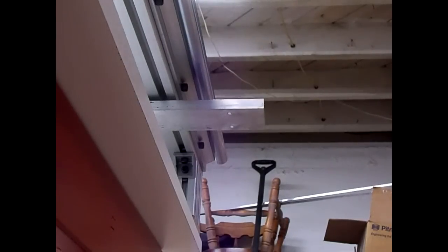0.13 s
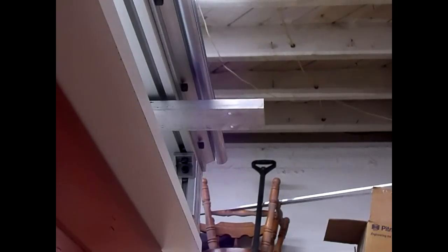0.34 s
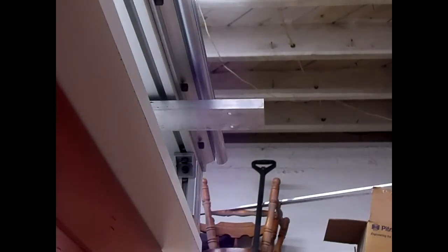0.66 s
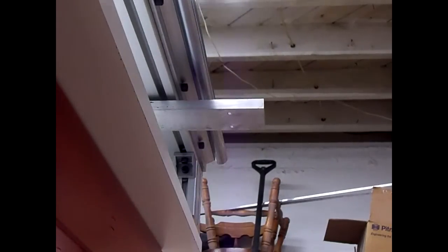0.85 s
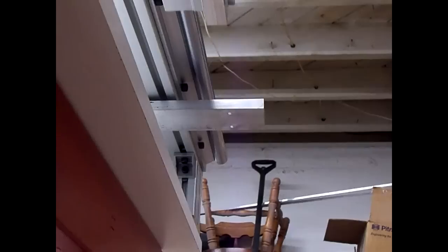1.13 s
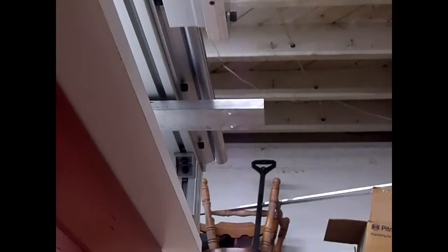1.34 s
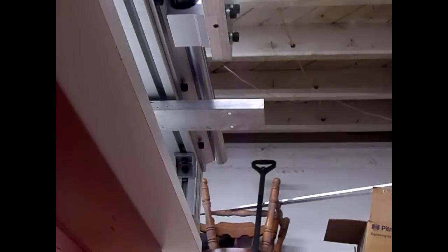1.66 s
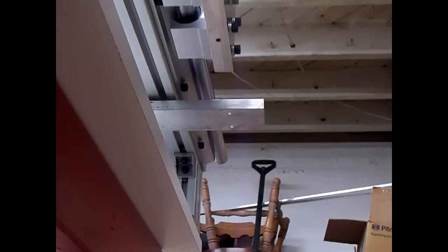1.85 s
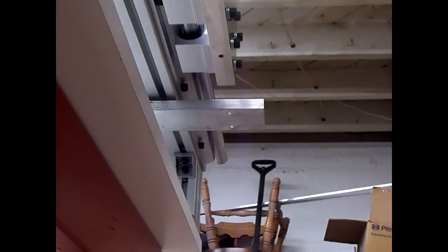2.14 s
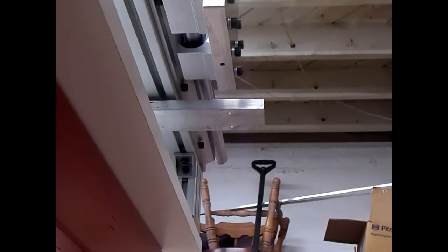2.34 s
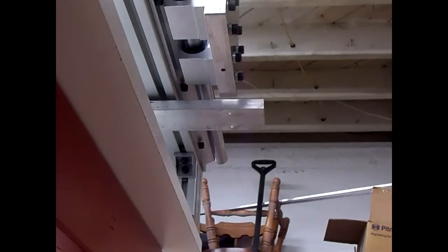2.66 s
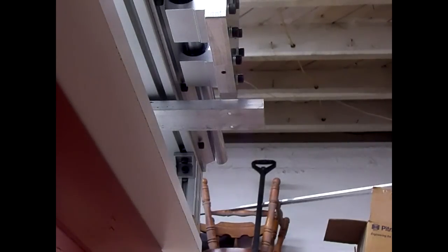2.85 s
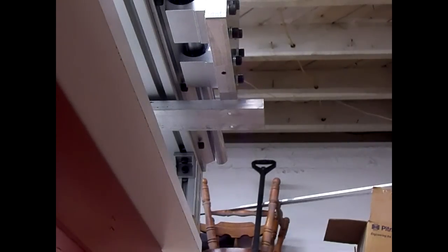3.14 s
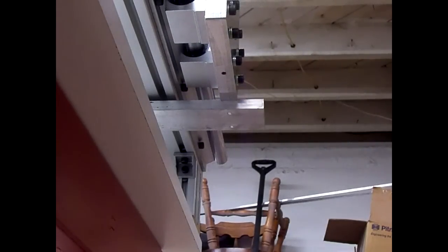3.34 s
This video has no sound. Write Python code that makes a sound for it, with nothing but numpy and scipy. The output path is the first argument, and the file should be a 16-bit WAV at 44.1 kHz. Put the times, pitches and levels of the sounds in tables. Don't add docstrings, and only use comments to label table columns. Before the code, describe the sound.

Hissing, ticking roll of a bearing carriage on a rail fades to a bump before a metallic crash.

```python
import sys
import numpy as np
from scipy import signal
from scipy.io import wavfile
from scipy.ndimage import uniform_filter1d

SR = 44100
rng = np.random.default_rng(int(sys.argv[2]) if len(sys.argv) > 2 else 0)


def transcribe(u):
    v = np.clip(np.atleast_2d(u).T, -1, 1)
    q = np.round(v * 32767).astype(np.int16)
    wavfile.write(sys.argv[1], SR, q)


def invert_db(x):
    u = np.asarray(x, float) / 20
    return 10 ** u


N = 154350

# (time [s], level [dB]); the last row is the stop
ROLLING_FORCE = [(0, -26), (.1, -26), (.28, -25.5), (.38, -23), (.5, -23), (.7, -24), (.8, -28.5),
                 (.93, -32), (1.12, -35.5), (1.25, -36.5), (1.54, -40), (1.76, -43), (1.95, -38.5),
                 (2.3, -43), (2.501, -48)]
ROLL_END_S = ROLLING_FORCE[-1][0]


def evened(x):
    return x / np.sqrt(np.mean(x ** 2) + 1e-20)


def add(mix, s, sound):
    part = mix[round(s * SR):][:len(sound)]
    part += sound[:len(part)]


def colour(x, points):
    hz, db = np.transpose(points)
    bin_hz = np.abs(np.fft.fftfreq(4096, 1 / SR))
    log_gain = np.log(invert_db(np.interp(np.log(bin_hz + 1), np.log(hz + 1), db)))
    taps = np.fft.ifft(np.exp(np.conj(signal.hilbert(log_gain)))).real
    return signal.oaconvolve(x, taps / np.linalg.norm(taps))[:len(x)]


def resonate(x, hz, width_hz):
    radius = np.exp(-np.pi * width_hz / SR)
    pole = radius * np.exp(2j * np.pi * hz / SR)
    return np.sqrt(2 * (1 - radius ** 2)) * signal.lfilter([1], [1, -pole], x).imag


def ring(x, modes):
    return sum(invert_db(db) * resonate(x, hz, 2.2 / t60) for hz, db, t60 in modes)


def dull(x, edge_hz):
    leak_db = -21.5
    low = signal.sosfilt(signal.butter(5, edge_hz, fs=SR, output="sos"), x)
    return low + invert_db(leak_db) * x


def clicks(count, per_s, spread_db):
    chance, side, size = rng.random((3, count))
    size_db = spread_db * np.minimum(-np.log(size + 1e-9), 4)
    return evened((chance < per_s / SR) * np.sign(side - .5) * invert_db(size_db))


def slow(rate_hz):
    hz = np.geomspace(rate_hz / 10, rate_hz, 24)[:, None]
    at = np.arange(0, N + 32, 32)
    waves = np.sin(2 * np.pi * (hz * at / SR + rng.random(hz.shape)))
    return evened(np.interp(np.arange(N), at, np.sum(waves, 0)))


def patchy(x, depth_db):
    z = signal.stft(x, nperseg=512, noverlap=384)[2]
    field = rng.standard_normal(z.shape[::-1])
    field = uniform_filter1d(field, size=12, axis=0)
    field = uniform_filter1d(field, size=6, axis=1)
    return signal.istft(z * invert_db(depth_db * evened(field).T), nperseg=512, noverlap=384)[1][:N]


def swells(rows, hz, wander):
    t = np.arange(N) / SR
    power = sum(invert_db(2 * db) * np.exp(-(3.63 * (t - s) / length) ** 2) for s, db, length in rows)
    level = np.sqrt(2 * power) * invert_db(0.71 * slow(25.9))
    cycles = np.cumsum(hz * (1 + wander * slow(19))) / SR
    return level * np.sin(2 * np.pi * cycles)


def bumps(rows, spectrum, modes):
    modes_db = -6
    snap = 3
    out, t = np.zeros(N), np.arange(SR // 4) / SR
    for s, db, rise, t60, edge_hz in rows:
        grit = .5 * clicks(len(t), 4000, 2.5) + rng.standard_normal(len(t))
        grit[round(rise * SR)] = snap
        push = grit * np.minimum(t / rise, 1) ** 2 * invert_db(db - 60 * np.maximum(t - rise, 0) / t60)
        add(out, s, dull(colour(push, spectrum) + invert_db(modes_db) * ring(push, modes), edge_hz))
    return out


def force_db():
    stop_t60_s = 0.13
    t = np.arange(N) / SR
    s, db = np.transpose(ROLLING_FORCE)
    return np.interp(t, s, db) - 60 * np.maximum(t - ROLL_END_S, 0) / stop_t60_s


def rolling():
    # (frequency [Hz], density [dB per Hz])
    fast_hiss = [(18, -60), (30, -54), (54, -49), (80, -20), (114, -14), (281, -9.5), (336, 3), (800, -5.5),
                 (1610, -9), (14000, -26.5)]
    # (frequency [Hz], density [dB per Hz])
    slow_hiss = [(18, -18), (30, -37), (120, -0.5), (260, -12), (1460, -13.5), (1700, -14.5), (2840, -23),
                 (8810, -27), (14000, -33)]
    # (frequency [Hz], width [Hz], level when fast [dB], level when slow [dB])
    rail_notes = [(352, 24, -10.5, -26), (422, 60, -12, -13.5), (567, 38, -24, -12), (662, 17, -19, -18),
                  (1111, 33, -44, -15), (1266, 26, -18.5, -17), (1705, 70, -14, -71),
                  (2200, 500, -13, -14.5), (4750, 770, -24, -18.5)]
    # (frequency [Hz], width [Hz], when fast [dB], when slow [dB])
    slow_note = (1715, 50, -36, -11)
    fast_at_db, slow_at_db = -25, -35.5
    contacts_per_s, contact_spread_db, contact_share = 4000, 2, 0.99

    db = force_db()
    fast = np.clip((db - slow_at_db) / (fast_at_db - slow_at_db), 0, 1)
    contacts = contact_share * clicks(N, contacts_per_s, contact_spread_db)
    drive = evened(contacts + rng.standard_normal(N)) * invert_db(0.19 * slow(56))
    out = np.sqrt(fast) * colour(drive, fast_hiss)
    out = out + np.sqrt(1 - fast) * invert_db(-4.5) * colour(drive[::-1], slow_hiss)
    for hz, width_hz, fast_db, slow_db in list(rail_notes) + [slow_note]:
        out = out + invert_db(slow_db + (fast_db - slow_db) * fast) * resonate(drive, hz, width_hz)
    return invert_db(db) * patchy(out, 1.1)


def bench():
    # (peak time [s], level [dB], length [s])
    hum = [(0.153, -41.5, 0.22), (.39, -32.5, 0.31), (0.556, -37, 0.15), (0.702, -30.5, 0.11),
           (.83, -35.5, 0.1), (0.973, -41, 0.28), (1.131, -32, 0.15), (1.344, -32, 0.19),
           (1.587, -46.5, 0.54), (1.84, -41, .12), (1.948, -33, 0.12), (2.045, -34.5, 0.18),
           (2.18, -39.5, 0.16), (2.314, -38, 0.25)]
    # (peak time [s], level [dB], length [s])
    shelf = [
        (.05, -42, 0.81),
        (.5, -37.5, 0.44),
        (.92, -40, 0.17),
        (1.33, -41.5, 0.43),
        (1.8, -42.5, 0.32),
        (2.3, -48, 0.25),
    ]
    # (peak time [s], level [dB], length [s])
    sway = [
        (.02, -39.5, 0.21),
        (.36, -47, 0.21),
    ]
    # (peak time [s], level [dB], length [s])
    thump = [
        (3.12, -43, 0.13),
        (3.22, -48, 0.22),
    ]
    return (swells(hum, 118, 0.018) + swells(shelf, 188.7, 0.0066)
            + swells(sway, 54.3, 0.056) + swells(thump, 100, 0.081))


def air():
    # (frequency [Hz], density [dB per Hz])
    air_spectrum = [(15, -21), (25, -7), (155, -11), (192, -13.5), (525, -19.5), (1360, -26.5),
                    (1780, -29.5), (1920, -28), (14000, -36.5)]
    return invert_db(-43.5 + 0.99 * slow(8)) * colour(rng.standard_normal(N), air_spectrum)


def block_bumps():
    # (time [s], level [dB], rise [s], t60 [s], dull edge [Hz])
    pushes = [
        (.036, -28.5, 0.022, 0.21, 15900),
        (.06, -25, 0.013, 0.14, 16000),
        (2.638, -26.5, 0.00039, 0.05, 2310),
        (2.638, -28.5, 0.00036, 0.085, 6240),
        (2.647, -34.5, 0.00057, 0.22, 14300),
        (2.845, -50, 0.008, 0.061, 2200),
    ]
    # (time [s], level [dB], rise [s], t60 [s], dull edge [Hz])
    grazes = [
        (2.501, -34, 0.021, 0.073, 15900),
        (2.506, -45, 0.0029, 0.023, 3620),
    ]
    # (frequency [Hz], density [dB per Hz])
    block_body = [(88, -45), (150, -17), (434, 5.5), (1800, -1), (3310, -4), (5740, -3.5), (14000, -9.5)]
    # (frequency [Hz], level [dB], t60 [s])
    block_modes = [(393, -7, .04), (494, -7, .05), (775, 2, .05), (1040, -10, .03), (1577, -11, .03),
                   (1943, -8, .035), (2331, -15, .03)]
    # (frequency [Hz], level [dB], t60 [s])
    graze_modes = [(450, -6, .02), (1696, -12, .02), (2929, -9, .02)]
    return bumps(pushes, block_body, block_modes) + bumps(grazes, block_body, graze_modes)


def surges():
    # (time [s], level [dB], note [Hz])
    flares = [(.065, -24, 1360), (.15, -26, 1660), (.17, -28, 665), (0.313, -27.5, 350), (.365, -47, 620),
              (0.451, -29, 432), (.465, -23, 1130), (.5, -35, 1560), (.53, -41, 400), (0.583, -22, 1220),
              (0.619, -25.5, 570), (0.709, -32, 1620), (.76, -30, 610), (.83, -29, 1590)]
    rise_s, t60_s, width_hz = 0.0073, .12, 60
    out, t = np.zeros(N), np.arange(SR // 5) / SR
    shape = np.minimum(t / rise_s, 1) * invert_db(-60 * np.maximum(t - rise_s, 0) / t60_s)
    for s, db, hz in flares:
        grit = rng.standard_normal(len(t))
        add(out, s, invert_db(db) * resonate(shape * grit, hz, width_hz))
    return out


def ticks():
    # (time [s], peak level [dB], ring [Hz], treble share [dB])
    ball_ticks = [(0.1745, -21.5, 4730, -6), (0.31, -18, 4560, -1), (0.3316, -15.5, 4330, -8),
                  (0.3605, -25, 3890, -4), (0.394, -14, 4550, -3), (0.4304, -16.5, 4440, 0),
                  (0.458, -11.5, 5040, -4), (0.4907, -12.5, 4400, -10), (0.551, -15, 4250, -14),
                  (0.6054, -22, 4380, 0), (0.6967, -18, 3850, -16), (0.7426, -32, 4450, -16),
                  (0.7941, -28, 4730, -10), (0.8145, -20.5, 5240, -8), (0.867, -27, 5120, -6),
                  (0.8807, -32, 3800, -6), (0.9284, -28.5, 5520, -6), (0.955, -35, 5310, 3),
                  (1.0147, -27, 4120, -3), (1.0914, -24, 4740, -4), (1.1094, -32, 5060, -6),
                  (1.1364, -43, 4550, 2), (1.189, -29, 4930, -6), (1.2097, -29.5, 5100, 0),
                  (1.236, -39, 6470, 11), (1.289, -37, 5220, -6), (1.311, -31, 5840, 4),
                  (1.3915, -31, 5030, -1), (1.411, -32, 4550, 3), (1.5265, -30.5, 4130, 4),
                  (1.5574, -28, 4600, 2.5), (1.6256, -31.5, 5030, 7), (1.705, -32.5, 4960, 5),
                  (1.8292, -28.5, 4990, -6), (1.955, -33, 5430, 6), (1.975, -32, 4660, 3),
                  (2.022, -36, 5720, 5), (2.1058, -31.5, 4870, 9.5), (2.2434, -33.5, 4730, 4),
                  (2.413, -34, 7950, 4)]
    small_per_s, small_db, small_ring_hz, small_treble_db = 70, -2.5, 4830, -1
    tick_db, t60_s, width_hz = -5, .014, 1700
    treble_hz, low_cut_hz = 8150, 3400

    db = force_db()
    rows = list(ball_ticks)
    for when, size, pitch in rng.random((round(small_per_s * ROLL_END_S), 3)):
        s = when * ROLL_END_S
        peak_db = db[int(s * SR)] + small_db + 7 * size ** 2
        rows.append((s, peak_db, small_ring_hz * (0.54 + 0.13 * pitch), small_treble_db))

    out, t = np.zeros(N), np.arange(900) / SR
    high = signal.butter(3, treble_hz, "high", fs=SR, output="sos")
    for s, peak_db, hz, treble_db in rows:
        snap = rng.standard_normal(len(t))
        snap = snap / np.linalg.norm(snap[:20]) * np.sqrt(20)
        snap = snap * invert_db(peak_db + tick_db - 60 * t / t60_s)
        add(out, s, resonate(snap, hz, width_hz) + invert_db(treble_db) * signal.sosfilt(high, snap))
    return signal.sosfilt(signal.butter(3, low_cut_hz, "high", fs=SR, output="sos"), out)


def bracket_knocks():
    # (time [s], level [dB], rise [s], t60 [s], dull edge [Hz])
    knocks = [
        (3.049, -37, 0.0011, 0.18, 3020),
        (3.059, -28.5, 0.0035, 0.036, 3030),
        (3.066, -40, 0.0034, 0.035, 2800),
        (3.087, -37.5, 0.0068, 0.084, 2200),
    ]
    # (frequency [Hz], density [dB per Hz])
    bracket_body = [(250, -33), (560, 1.5), (1300, -2.5), (2600, 0), (3400, -34)]
    # (frequency [Hz], level [dB], t60 [s])
    bracket_modes = [(593, -3, .05), (890, -2, .04), (980, 1, .05), (1258, 5, .05), (1378, -1, .05),
                     (1940, 1, .05), (2300, -6, .04), (2600, -2, .035)]
    return bumps(knocks, bracket_body, bracket_modes)


def clatter():
    # (time [s], peak level [dB], dull edge [Hz])
    blows = [(3.148, -27.5, 12000), (3.152, -19, 6960), (3.179, -18.5, 2780), (3.212, -13.5, 7500),
             (3.232, -8.5, 2630), (3.25, -17.5, 8800), (3.267, -7.5, 4900), (3.284, -14.5, 11300),
             (3.293, -15, 8900), (3.319, -10, 5700), (3.344, -11, 9200), (3.353, -4, 7700),
             (3.376, -4, 14300), (3.392, -7.5, 12100), (3.41, -3.5, 12100), (3.425, -7.5, 9200),
             (3.436, -18, 9300), (3.454, -19, 9500), (3.474, -6.5, 11000), (3.489, -5, 14100)]
    # (frequency [Hz], density [dB per Hz])
    clatter_body = [(120, -30), (200, -22.5), (393, -18), (522, -2.5), (1250, -9), (1880, -5.5), (2780, -9),
                    (7930, -8), (14000, -13)]
    # (frequency [Hz], level [dB], t60 [s])
    part_modes = [(611, -8, .15), (697, -8, .12), (1040, -10, .1), (1346, -8, .2), (1680, -9, .15),
                  (2289, -9, .2), (2517, -10, .2), (2612, -10, .2), (6290, -12, .03), (7714, -14, .03),
                  (9500, -15, .1)]
    # (frequency [Hz], level [dB], t60 [s])
    bar_modes = [(537, -3, .25), (1892, -3, .35), (2085, -6, .35), (3684, -11, .3), (5808, -10, .3),
                 (10160, -14, .3)]
    blow_db, blow_t60_s, ring_db = -11.5, 0.41, -13.5
    rattle_per_s, rattle_spread_db = 2800, 4.5

    drive, t = np.zeros(N), np.arange(SR // 2) / SR
    for s, db, edge_hz in blows:
        rattle = .45 * clicks(len(t), rattle_per_s, rattle_spread_db) + rng.standard_normal(len(t))
        burst = rattle * np.minimum(t / 0.003, 1) * invert_db(db + blow_db - 60 * t / blow_t60_s)
        add(drive, s, dull(burst, edge_hz))
    drive = drive * invert_db(1.34 * slow(120))
    body = patchy(colour(drive, clatter_body), 2.0)
    body = body + invert_db(ring_db) * ring(drive, list(part_modes) + list(bar_modes))
    return signal.sosfilt(signal.butter(2, 180, "high", fs=SR, output="sos"), body)


def room(x):
    t60_s, room_db = .3, -6.5
    taps, at = np.zeros(SR // 2), np.arange(150, SR // 2 - 20, 20)
    taps[at + rng.integers(0, 20, len(at))] = rng.choice([-1., 1.], len(at))
    taps = taps * invert_db(-60 * np.arange(len(taps)) / SR / t60_s)
    return x + invert_db(room_db) * signal.oaconvolve(x, taps / np.linalg.norm(taps))[:N]


def scene():
    impacts = block_bumps() + ticks() + bracket_knocks() + clatter()
    return (rolling() + bench() + air() + surges() + room(impacts))[None]


def low_pass(x):
    return signal.sosfilt(signal.butter(12, 14790, fs=SR, output="sos"), x)


def record(dry):
    limit, edge_hz = .9, 14000
    soft = limit * np.tanh(dry / limit)
    edge = signal.firwin(1023, edge_hz, window=("kaiser", 10), fs=SR)
    edged = signal.oaconvolve(soft, edge[None], "same")
    return low_pass(edged)


dry = scene()
out = record(dry)
transcribe(out)
```